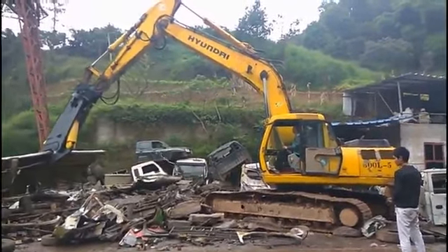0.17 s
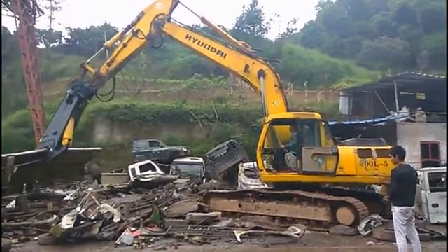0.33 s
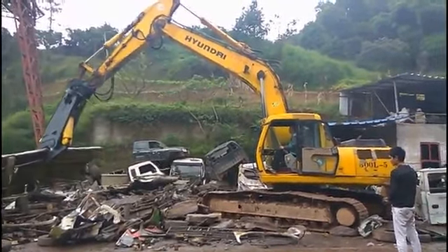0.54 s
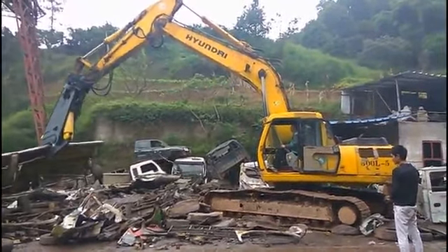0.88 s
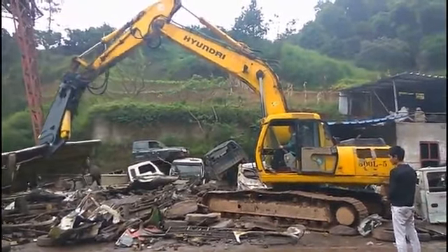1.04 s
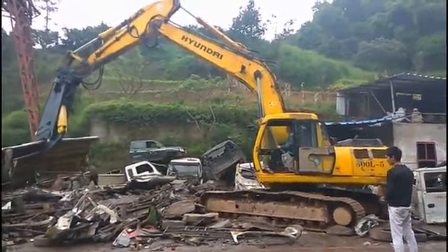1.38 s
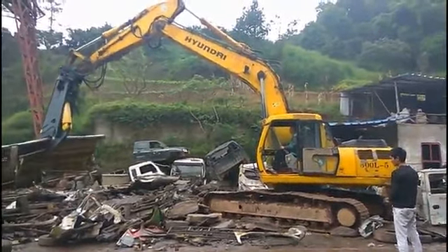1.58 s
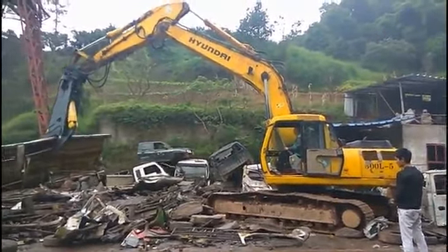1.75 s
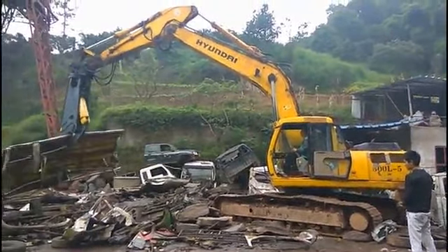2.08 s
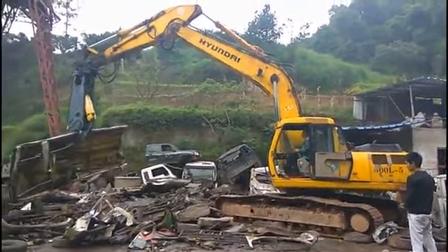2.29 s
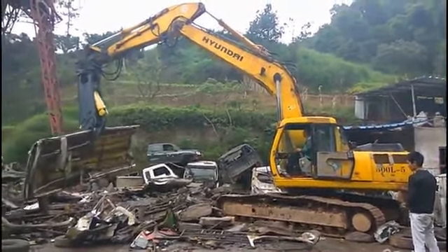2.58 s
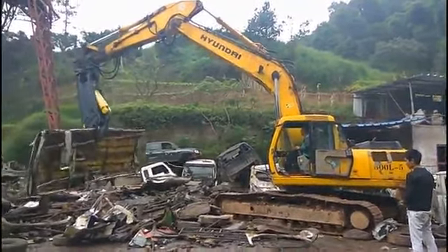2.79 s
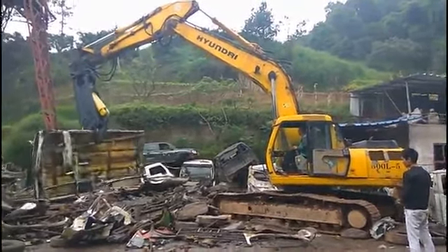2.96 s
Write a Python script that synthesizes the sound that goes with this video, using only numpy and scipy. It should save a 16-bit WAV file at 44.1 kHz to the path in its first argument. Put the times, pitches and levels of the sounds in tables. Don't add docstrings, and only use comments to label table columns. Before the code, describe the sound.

Excavator engine roars evenly outdoors, alone at first; light metallic ticks follow, then a brief thudding drag, a slack moment, and a louder grinding, clattering drag to the end. Phone stereo at some distance, dull treble.

```python
import sys
import numpy as np
from scipy import signal
from scipy.fft import rfft, irfft, next_fast_len
from scipy.io import wavfile
from scipy.ndimage import uniform_filter1d

SR = 44100
rng = np.random.default_rng(int(sys.argv[2]) if len(sys.argv) > 2 else 0)


def waveform_to_disk(signal):
    frames = np.transpose(np.atleast_2d(signal))
    scaled = np.clip(frames, -1, 1) * 32767
    samples = np.round(scaled).astype(np.int16)
    wavfile.write(sys.argv[1], SR, samples)


def ratio(d):
    e = np.asarray(d, float) / 20
    return 10 ** e


N = 138033

CYLINDER_DB = [-6.5, -6.5, -1, -8, -7.5, -6]
# pitch_hz, level_db
HUM_TONES = [(97, -45), (220.5, -35), (438, -44), (657, -43), (875, -46.5), (1023, -44), (1099, -44),
             (1194, -44.5), (1448, -49.5)]
# time_s, level_db
PUMP_LEVEL = [
    (0, 1.1),
    (.7, 1.5),
    (1.398, 2),
    (2.051, 0.5),
    (2.301, -3.5),
    (2.6, -8),
    (3.13, -3),
]
# freq_hz, density_db_per_hz
ROAR_LOW = [(25, -22), (80, -5.5), (145, -11.5), (260, -12), (335, -13.5), (420, -9), (520, -13.5),
            (650, -5)]
ROAR_HIGH = [(800, -4.5), (1400, -3.5), (1700, -4.5), (2800, -9.5), (3800, -14), (5500, -12), (6800, -20),
             (7250, -17.5)]
# time_s, level_db
DRAG = [
    (1.901, -69.5),
    (2.06, -29),
    (2.15, -26),
    (2.3, -29.5),
    (2.52, -32.5),
    (2.62, -18.5),
    (2.9, -19.5),
    (3.041, -22.5),
    (3.13, -22),
]
# freq_hz, density_db_per_hz
GRIND_COLOUR = [(35, -13), (70, -5), (115, -7), (300, -7.5), (600, -11.5), (2000, -15.5), (5500, -24.5),
                (7400, -22)]
# start_s, level_db, pitch_hz, t60_s
KNOCKS = [(2.041, -20.5, 234, 0.12), (1.6, -26, 170, 0.074), (2.088, -22.5, 360, 0.083),
          (2.085, -24, 690, 0.09), (2.14, -23.5, 760, 0.087), (2.166, -21.5, 300, .04),
          (2.63, -20, 450, 0.087), (2.712, -21, 620, 0.037), (2.127, -9, 130, 0.037),
          (2.128, -14, 258, 0.082), (1.9, -12, 150, 0.036), (2.19, -14, 125, 0.098),
          (2.622, -14.5, 118, 0.25), (2.615, -20, 755, 0.19), (2.656, -16, 118, 0.3),
          (2.707, -12, 117, 0.26), (2.785, -17.5, 248.8, 0.53), (2.82, -18.5, 250.5, 0.13),
          (2.85, -15.5, 190, 0.22), (2.884, -20, 1200, 0.072), (2.711, -21, 1000, 0.051),
          (2.26, -26.5, 120, 1), (2.302, -26, 73.4, 1), (2.942, -18.5, 139, 0.21), (3.082, -15, 249, 0.081),
          (3.11, -12.5, 130, 0.32), (3.108, -19, 448, .12)]
# peak_s, level_db, rise_s, fall_s, pitch_hz
RATTLES = [(1.198, -30, 0.012, 0.023, 2730), (1.2, -31, 0.017, 0.023, 4270),
           (1.373, -30.5, 0.0048, 0.02, 6000), (1.374, -33.5, 0.0067, 0.017, 3730),
           (1.409, -40.5, .015, 0.054, 6030), (1.53, -36.5, .004, 0.015, 5400),
           (1.565, -29.5, 0.011, 0.023, 3900), (1.582, -24.5, 0.011, 0.038, 5800),
           (1.626, -29, 0.011, 0.02, 5750), (1.657, -33, 0.01, .015, 5460), (1.734, -41, .004, .012, 2400),
           (1.748, -32, 0.0061, 0.038, 6000), (1.81, -43, .004, 0.013, 2550),
           (1.873, -39, 0.0045, 0.014, 2700), (1.911, -28.5, 0.011, 0.035, 5200),
           (1.945, -33, 0.015, 0.02, 5000), (1.984, -39.5, .004, 0.01, 2400),
           (2.091, -30, 0.0037, 0.024, 5780), (2.091, -31, 0.003, 0.023, 2300),
           (2.121, -31, .004, 0.044, 2600), (2.15, -24.5, 0.024, 0.03, 6000),
           (2.29, -36, 0.0054, 0.033, 5200), (2.404, -42.5, 0.0043, 0.01, 1600),
           (2.568, -32.5, 0.0099, 0.08, 4000), (2.619, -26.5, .012, .025, 3500),
           (2.636, -30.5, .004, 0.012, 2410), (2.712, -25, 0.018, 0.018, 5800),
           (2.713, -26, 0.006, 0.0042, 1200), (2.76, -31, .02, 0.016, 2800),
           (2.798, -29.5, .012, 0.011, 5700), (2.826, -28.5, 0.011, 0.012, 1500),
           (2.878, -20, 0.013, 0.023, 5600), (2.89, -25.5, 0.018, 0.044, 1420),
           (2.92, -24.5, 0.015, 0.031, 5330), (2.938, -25.5, .004, .01, 5200),
           (2.973, -23, 0.005, 0.015, 5200), (2.975, -27, .01, .025, 2300), (3.005, -26, .012, 0.028, 5600),
           (3.091, -41, 0.015, .02, 5000), (3.117, -30.5, 0.029, .03, 830)]
# freq_hz, gain_db
HEAP_COLOUR = [(3300, -1.1), (4300, -1), (5700, 1.5), (6600, -1.5), (7500, -1.5)]
# freq_hz, left_minus_right_db
BALANCE_DB = [(1000, -.3), (1550, -2.5), (2300, 4), (2900, 6), (4100, -.5), (5700, 12.5), (6500, 9),
              (7100, 2)]
# freq_hz, share_0_to_1
DIRECT_SHARE = [(100, .994), (300, .96), (700, .76), (1200, .36), (1700, .72), (1980, .12), (3780, .42),
                (4300, .07)]
# freq_hz, left_lead_rad
ENGINE_PHASE = [(300, .01), (780, .25), (1450, .8), (1690, 3.1), (2000, 1.9), (3270, .2), (3750, -3.1),
                (4000, -6.3)]
SCRAP_PHASE = [(300, -.02), (700, -.2), (1030, -.5), (1380, -1.3), (1650, -2.9), (3100, -3.3), (3800, -5.6)]

TURN_HZ = 36.73
EXHAUST_DB, CLATTER_DEPTH = -52, 0.1
ROAR_LOW_DB, ROAR_HIGH_DB, ROAR_PATCHY_DB = -31, -33, 0.8
HUM_FLUTTER_DB, HUM_WOBBLE = 1.0, 0.0012
HUM_BLUR_RAD_PER_HZ = 0.002
SCRAP_FROM_S = 1.1
SCRAP_SCATTER = 1.6
GRIND_PATCHY_DB, GRIND_CLUMP_DB, GRIND_CLICKS_PER_S = 1.4, 1.1, 2500
RATTLE_OCTAVES, RATTLE_CLICKS_PER_S, RING_CYCLES = 0.58, 10000, 26
CLICK_SPREAD_DB = 3
YARD_DB, YARD_T60_S = -9, 0.31
MOTTLE = 0.45
HOLE_DB = -4.3
CUTOFF_HZ = 7560


def rms_one(x):
    return x / np.sqrt(np.mean(x ** 2) + 1e-20)


def at_hz(points, hz):
    table_hz, value = np.array(points).T
    return np.interp(np.log(hz + 1), np.log(table_hz), value)


def over_time(points):
    return ratio(np.interp(np.arange(N) / SR, *np.transpose(points)))


def drift(rate_hz):
    r = np.exp(-80 * np.pi * rate_hz / SR)
    white = rng.standard_normal(N // 40 + 2002)
    slow = signal.lfilter([1], [1, -2 * r, r * r], white)[2000:]
    return np.interp(np.arange(N) / 40, np.arange(len(slow)), rms_one(slow))


def banded(source, spectrum, patchy_db, top_hz):
    count = source.shape[1]
    size = next_fast_len(count)
    hz = np.fft.rfftfreq(size, 1 / SR)
    low_hz = 0.8 * spectrum[0][0]
    colour = ratio(at_hz(spectrum, hz)) * (hz >= low_hz) / np.sqrt(1 + (hz / top_hz) ** 8)
    whole = rfft(source.astype(np.float32), size) * colour.astype(np.float32)
    place = (1.5 * np.log2(hz / low_hz + 1e-9)).astype(np.float32)
    out = 0
    for k in range(int(1.5 * np.log2(1.5 * top_hz / low_hz)) + 1):
        band = irfft(whole * np.clip(1 - abs(place - k), 0, 1), size)[:, :count]
        out = out + ratio(patchy_db * drift(11)[:count]) * band
    return rms_one(out)


def firing_beat():
    firing = np.cumsum(3 * TURN_HZ * (1 + 0.004 * drift(2))) / SR
    beat = ratio(np.array(CYLINDER_DB)[firing.astype(int) % 6]) * np.exp(-4.0 * (firing % 1))
    return beat - beat.mean()


def exhaust(beat):
    pipe = signal.butter(2, [30, 260], "band", fs=SR, output="sos")
    return ratio(EXHAUST_DB) * rms_one(signal.sosfilt(pipe, beat))


def roar(beat):
    low = banded(rng.standard_normal((3, N)), ROAR_LOW, ROAR_PATCHY_DB, 552)
    gate = 1 + CLATTER_DEPTH * rms_one(beat)
    high = banded(rng.standard_normal((3, N)) * gate, ROAR_HIGH, ROAR_PATCHY_DB, 7800)
    return ratio(ROAR_LOW_DB) * low + ratio(ROAR_HIGH_DB) * high


def pump_hum():
    turning_s = np.cumsum(1 + HUM_WOBBLE * drift(3.7)) / SR
    hum = 0
    for hz, db in HUM_TONES:
        flutter_db = HUM_FLUTTER_DB * np.sqrt(hz / 180) * drift(7.9)
        blur_rad = HUM_BLUR_RAD_PER_HZ * hz * drift(5.96)
        hum = hum + ratio(db + 2 + flutter_db) * np.sin(2 * np.pi * hz * turning_s + blur_rad)
    return over_time(PUMP_LEVEL) * hum


def engine():
    beat = firing_beat()
    tones = pump_hum() + exhaust(beat)
    return roar(beat) + tones * [[1], [0], [0]]


def clicks(count, rate_hz):
    when, size, sign = rng.random((3, 3, count))
    height = ratio(-CLICK_SPREAD_DB * np.log(size + 0.023))
    return (when < rate_hz / SR) * height * np.sign(sign - 0.5)


def grind():
    first = int(SCRAP_FROM_S * SR)
    clumps = ratio(GRIND_CLUMP_DB * drift(25)[first:])
    contacts = clicks(N - first, GRIND_CLICKS_PER_S) * clumps
    grit = banded(contacts, GRIND_COLOUR, GRIND_PATCHY_DB, 7000)
    return over_time(DRAG) * np.pad(grit, ((0, 0), (first, 0)))


def knocks():
    out, t = np.zeros(N + SR), np.arange(SR // 2) / SR
    for s, db, hz, t60 in KNOCKS:
        swell = ratio(db - 60 * t / t60) * (1 - np.exp(-t * hz / 0.35))
        panel = np.sin(2 * np.pi * hz * t)
        neighbour = 0.33 * ratio(-40 * t / t60) * np.sin(2 * np.pi * 1.37 * hz * t)
        out[int(s * SR):][:len(t)] += swell * (panel + neighbour)
    return out[:N] * np.ones((3, 1))


def ring(contacts, hz, t60_s):
    r, w = ratio(-60 / (t60_s * SR)), 2 * np.pi * hz / SR
    return signal.lfilter([0, np.sin(w)], [1, -2 * r * np.cos(w), r * r], contacts + 1e-18)


def rattles():
    pitches = np.geomspace(500, 7600, 40) * rng.uniform(0.98, 1.02, 40)
    span, first, lead_s = SR // 4, int(SCRAP_FROM_S * SR), 0.06
    t = np.arange(span) / SR - lead_s
    drive = np.zeros((40, 3, N - first + span))
    for s, db, rise, fall, hz in RATTLES:
        shape = np.where(t < 0, np.exp(-(t / rise) ** 2), np.exp(-np.maximum(t, 0) / fall))
        colour = np.exp(-0.5 * (np.log2(pitches / hz) / RATTLE_OCTAVES) ** 2)
        colour *= ratio(rng.normal(0, 1.5, 40)) * np.sqrt(pitches / hz)
        dealt = rng.integers(0, 40, span)
        start = int((s - lead_s) * SR) - first
        contacts = ratio(db + 2) * shape * clicks(span, RATTLE_CLICKS_PER_S) * colour[dealt]
        drive[dealt, :, start + np.arange(span)] += contacts.T
    rung = sum(ring(d[:, :-span], hz, RING_CYCLES / hz) for d, hz in zip(drive, pitches))
    return np.pad(rung, ((0, 0), (first, 0)))


def yard(x):
    t = np.arange(SR // 2) / SR
    tail = rng.standard_normal((3, len(t))) * ratio(-60 * t / YARD_T60_S) * (t > 0.008)
    tail /= np.sqrt(np.sum(tail[0] ** 2))
    return x + ratio(YARD_DB) * signal.fftconvolve(x, tail, axes=1)[:, :N]


def heap_colour(x):
    size = 2 ** 18
    gain = ratio(at_hz(HEAP_COLOUR, np.fft.rfftfreq(size, 1 / SR)))
    return irfft(rfft(x, size) * gain)[:, :N]


def ports(x, phase_table, scatter):
    size = next_fast_len(N + 4096)
    hz = np.fft.rfftfreq(size, 1 / SR)
    direct = np.clip(at_hz(DIRECT_SHARE, hz), 0, 1) ** scatter
    side = np.array([[0.5], [-0.5]])
    whole = rfft(x, size)
    step = np.exp(1j * side * at_hz(phase_table, hz))
    both = np.sqrt(direct) * step * whole[0] + np.sqrt(1 - direct) * whole[1:]
    return irfft(both * ratio(side * at_hz(BALANCE_DB, hz)), size)[:, :N]


def mottle(x):
    z = signal.stft(np.array([x[0] + x[1], x[0] - x[1]]) / 2, nperseg=1024)[2]
    near = uniform_filter1d(uniform_filter1d(abs(z) ** 2, size=3, axis=1), size=3, axis=2) + 1e-16
    wide = uniform_filter1d(near, size=25, axis=1)
    place = np.arange(513)[:, None]
    share = MOTTLE * np.clip(place / 30 - 0.4, 0, 1)
    around = uniform_filter1d(near.mean(0), size=41, axis=0)
    weak = uniform_filter1d(near, size=3, axis=1) < ratio(2 * HOLE_DB) * around
    weak = uniform_filter1d(1.0 * (weak & (place > 33)), size=3, axis=1) > 0
    gain = np.clip(near / wide, 0.01, 4) ** share * (1 - 0.95 * weak)
    mid, side = signal.istft(z * gain, nperseg=1024)[1][:, :N]
    return np.array([mid + side, mid - side])


def scene():
    blows = knocks()
    scrap = yard(rattles() + grind()) + 0.71 * blows + 0.28 * yard(blows)
    return ports(engine(), ENGINE_PHASE, 1) + ports(heap_colour(scrap), SCRAP_PHASE, SCRAP_SCATTER)


def top_cut(x):
    return signal.sosfilt(signal.butter(12, 7590, fs=SR, output="sos"), x)


def record(dry):
    steep = signal.ellip(12, 0.5, 70, CUTOFF_HZ, fs=SR, output="sos")
    cut = signal.sosfilt(steep, mottle(dry))
    return top_cut(cut)


dry = scene()
out = record(dry)
waveform_to_disk(out)
```